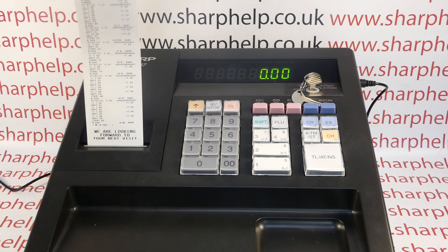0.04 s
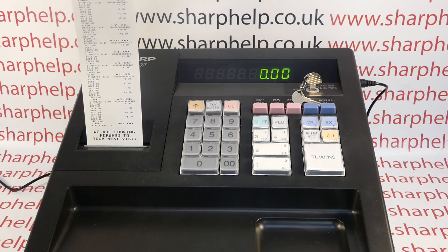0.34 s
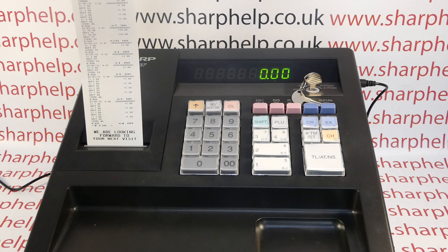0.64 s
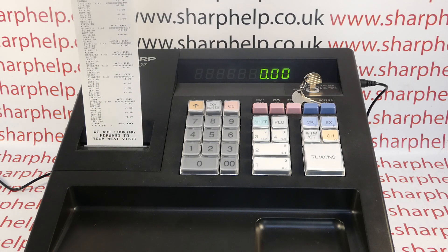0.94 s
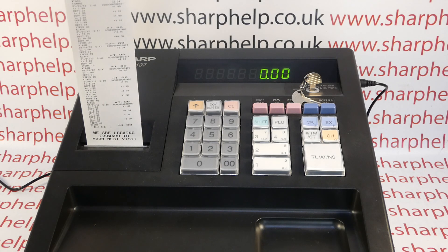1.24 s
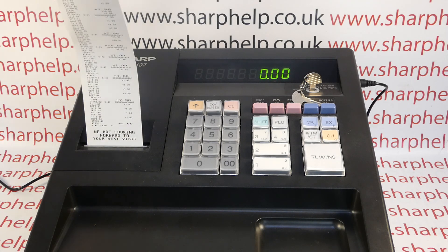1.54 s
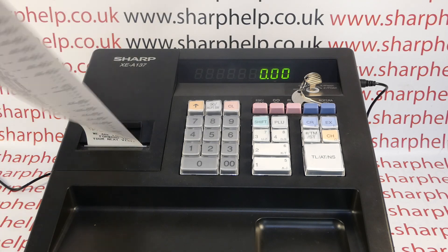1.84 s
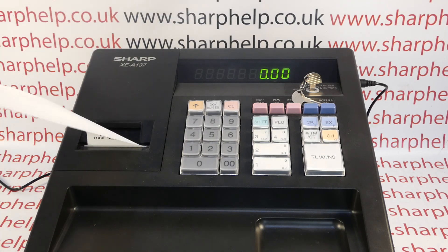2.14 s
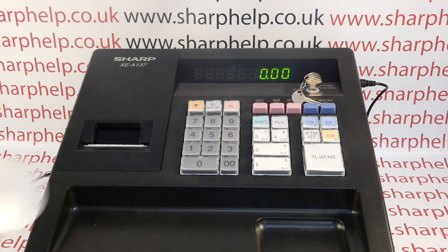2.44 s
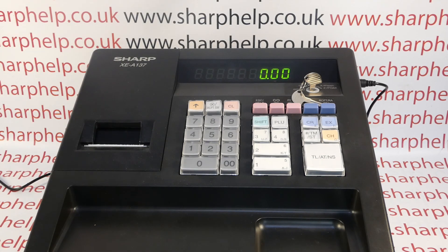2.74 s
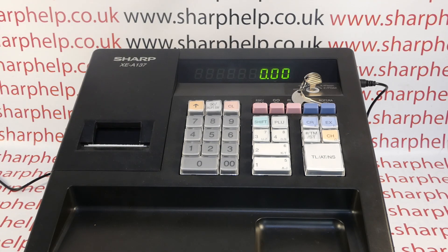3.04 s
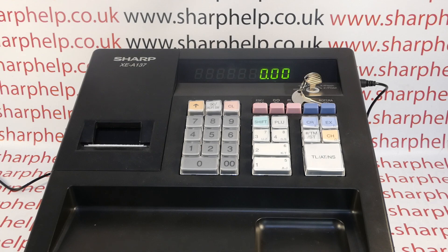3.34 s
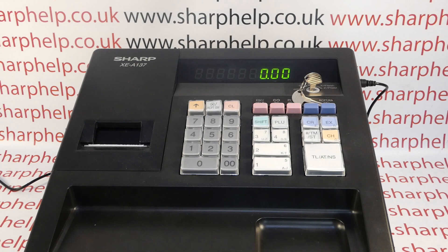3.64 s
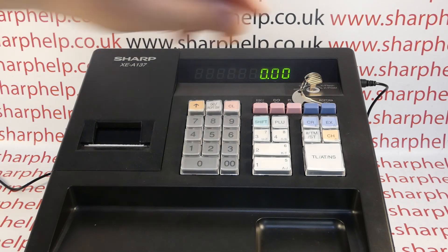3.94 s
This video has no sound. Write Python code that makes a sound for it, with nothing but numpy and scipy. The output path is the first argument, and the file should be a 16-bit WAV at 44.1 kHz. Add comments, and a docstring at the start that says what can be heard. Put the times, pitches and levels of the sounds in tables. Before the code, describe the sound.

A paper receipt is torn off and crumpled close by in a small, quiet room. At the start, a cash register's feed motor whines briefly, stopping with a light knock. From about 1.2 seconds a hand rustles softly along the strip, nicks it at 2 seconds and rips it off around 2.3. From 2.5 to 4 seconds the paper is crumpled, slightly left, with louder crackles, snaps and pops.

```python
"""A till's stepping motor whines briefly as it feeds paper, then stops with a knock. A hand
slides along the receipt, pulls it taut, nicks it on the serrated cutter, rips it off and crumples
it close by, in a small, quiet room. Fracturing fibres excite the resonances of sheet and housing;
friction and buckling make the rustle, snaps and pops."""
import sys
import numpy as np
from scipy import signal
from scipy.fft import rfft, irfft
from scipy.io import wavfile
from scipy.ndimage import map_coordinates

SR = 44100
rng = np.random.default_rng(int(sys.argv[2]) if len(sys.argv) > 2 else 0)


def bounce(signal):
    """Save signal as a 16-bit WAV file at the path given by the first command-line argument."""
    frames = np.transpose(np.atleast_2d(signal))
    limited = np.clip(frames, -1, 1)
    pcm = np.round(limited * 32767).astype(np.int16)
    wavfile.write(sys.argv[1], SR, pcm)


N = 176400
T = np.arange(N) / SR

# Each row: start and length in seconds, level and swell in dB, first and last sheet pitch in Hz.
CUTS = [(2.046, 0.029, -33, 0, 197, 215), (2.241, 0.12, -24.5, 2, 187, 796)]
# Each row: frequency in Hz, relative spectral density of the tearing in dB.
TEAR_SPECTRUM = [(50, -34), (135, -14), (185, 4), (450, -2), (1100, -4.5), (3000, -3), (5800, -5),
                 (10600, -11.5), (15500, -27.5)]
# Each row: frequency of a housing or cutter mode in Hz, relative level in dB, T60 in seconds.
HOUSING_MODES = [(208, -7, 0.33), (324, 3, 0.13), (495, -0.5, 0.52), (582, 5.5, 0.18), (1174, -2, 0.094),
                 (2980, 8, 0.095), (3670, -9, 0.087)]
FIBRES_PER_S, RIP_RELEASE_S, SHEET_WIDTH_HZ = 5000, 0.026, 114
def rips():
    """Fracture: breaking fibres excite housing and sheet, whose pitch rises as the uncut part narrows."""
    out = 0
    for s, length_s, db, swell_db, start_hz, end_hz in CUTS:
        progress = np.clip((T - s) / length_s, 0, 1)
        release = np.exp(-np.maximum(T - s - length_s, 0) / RIP_RELEASE_S)
        force = amp(db) * np.clip((T - s) / 0.0014, 0, 1) * release
        breaks = force * grains(FIBRES_PER_S, spread_db=-0.5) * amp(1.5 * drift(320))
        tear = colour(breaks * amp(swell_db * (progress - 0.5)), TEAR_SPECTRUM)
        bright_end = colour(breaks * progress ** 2, TREBLE)
        sheet_hz = start_hz * (end_hz / start_hz) ** (progress ** 2)
        sheet = (1 + progress ** 4) * gliding_ring(breaks, sheet_hz, SHEET_WIDTH_HZ)
        housing = sum(amp(level) * ring(breaks, hz, t60) / np.sqrt(t60 * SR)
                      for hz, level, t60 in HOUSING_MODES)
        out += tear + amp(-14) * bright_end + amp(-12) * sheet + amp(-6.5) * housing
    return out


# The paper's three bands. Each row: frequency in Hz, relative spectral density in dB.
LOWS = [(50, -21.5), (130, -17), (200, -4), (400, 3), (800, 3), (1300, 6), (1900, -1), (4000, -37)]
MIDS = [(600, -32.5), (1400, -6), (2000, 7.5), (3000, 8), (4500, 7), (6000, -25), (10000, -32.5)]
TREBLE = [(2500, -14), (4200, 12), (6200, 11.5), (8200, 4), (10300, 5), (12500, -6.5), (15500, -12.5)]
# Each row: start and length in seconds, then levels of lows, mids and treble in dB.
HAND_STROKES = [(1.178, 0.054, -59.5, -60, -65), (1.243, 0.047, -51.5, -52, -55),
                (1.296, 0.25, -62, -58, -57), (1.457, 0.18, -56, -68, -82), (1.538, 0.093, -63, -54.5, -52),
                (1.665, 0.099, -45.5, -47, -64), (1.77, 0.11, -45.5, -42.5, -46.5),
                (1.882, 0.07, -48, -44.5, -47.5), (1.96, 0.12, -56.5, -48.5, -49.5),
                (2.131, .1, -49, -44, -45), (2.501, 0.066, -44, -39.5, -60),
                (2.699, 0.16, -46.5, -47, -43.5), (2.861, 0.051, -34.5, -28.5, -36),
                (2.918, 0.084, -37.5, -27, -29), (3.009, 0.302, -40.5, -36, -34.5),
                (3.317, 0.072, -37.5, -33, -31), (3.393, 0.082, -42, -39.5, -39.5),
                (3.473, 0.13, -36.5, -36.5, -37.5), (3.613, 0.13, -44.5, -38, -38.5),
                (3.748, 0.077, -44, -40, -39), (3.819, 0.1, -40.5, -36, -35), (3.917, .14, -39, -41, -40)]
def rustle(texture):
    """Spectral shaping: each rub or squeeze sounds duller or brighter as the grip changes."""
    levels = sum(amp(db)[:, None] * envelope(s, length_s) for s, length_s, *db in HAND_STROKES)
    bands = [unit(flex(colour(texture, band))) for band in (LOWS, MIDS, TREBLE)]
    return sum(level * band for level, band in zip(levels, bands))


def crinkle(per_s, spread_db, cycles, rub_db):
    """Impulse excitation: clumps of tiny creases ring, each at its own pitch, over friction noise."""
    clicks = grains(per_s * amp(4 * drift(60)), spread_db)
    pitches = np.geomspace(400, 14000, 18)
    pitch_index = rng.integers(0, len(pitches), N)
    rings = sum(np.sqrt(hz) * unit(ring(clicks * (pitch_index == k), hz, cycles / hz))
                for k, hz in enumerate(pitches))
    return unit(unit(rings) + amp(-4) * clicks + amp(rub_db) * rng.standard_normal(N))


def flex(x, octaves=0.1, rate_hz=14):
    """Frequency modulation: after the last cut, the strip's resonances wander as it flexes."""
    freedom = np.clip(T - CUTS[-1][0], 0, 1)
    position = np.cumsum(2 ** (octaves * drift(rate_hz) * freedom))
    return map_coordinates(x, [position], order=5, mode="mirror")


# Each row: time in seconds, mid-band level in dB, lows and treble in dB from it, build-up in seconds.
BUCKLES = [(1.826, -30, -27, -10.5, 0.0021), (2.0425, -22, -1, 1.5, 0.00026),
           (2.129, -27.5, -11, -11, 0.00051), (2.243, -21, -5.5, 2, 0.00039),
           (2.584, -23.5, -26, 2, 0.00016), (2.709, -26.5, -15, -6, 0.00037),
           (2.864, -19.5, -18, -23, .0002), (2.991, -11.5, -3.5, -5, 0.0017),
           (3.333, -14, -17.5, -17, 0.0013), (3.374, -13.5, -7, -10, 0.0028),
           (3.438, -21.5, -8, -12, 0.00043), (3.557, -20.5, -2, -15, 0.0047),
           (3.895, -21, -20, -5, 0.00083)]
def snaps(decay_s=0.0013):
    """Buckling: the sheet gives way in bursts of cracks that swell and die within milliseconds."""
    low, mid, treble = np.zeros((3, N))
    half = SR // 40
    t = np.arange(-half, half) / SR
    for s, db, low_db, treble_db, build_s in BUCKLES:
        shape = np.exp(-abs(t) / np.where(t < 0, build_s, decay_s))
        burst = amp(db) * shape * rng.choice([-1, 1], len(t))
        span = slice(int(s * SR) - half, int(s * SR) + half)
        low[span] += burst * amp(low_db)
        mid[span] += burst
        treble[span] += burst * amp(treble_db)
    return colour(low, LOWS) + colour(mid, MIDS) + colour(treble, TREBLE)


# Each row: time in seconds, level in dB, pitch in Hz, T60 in seconds.
DENTS = [(1.516, -39.5, 2660, 0.015), (1.604, -31.5, 1823, 0.013), (1.722, -23, 1930, 0.0053),
         (1.749, -21, 1400, 0.0037), (1.856, -27.5, 2310, 0.017), (2.542, -20.5, 1990, 0.014),
         (2.76, -19, 3330, 0.0094), (2.821, -20, 1650, 0.0094), (3.2747, -1, 4270, 0.0014),
         (3.277, -10, 5800, 0.0085), (3.727, -17.5, 2520, 0.015), (3.786, -19, 3870, .012)]
def pops():
    """Snap-through: a dent flips over and rings for a moment at its own pitch."""
    rings = sum(ring(impulse(s, db), hz, t60) for s, db, hz, t60 in DENTS)
    return butterworth(rings, 1, 400, "high")


# Each row: start and length in seconds, level in dB, first and last pitch in Hz.
CURLS = [(1.344, 0.34, -57.5, 5030, 5900), (1.675, 0.066, -42.5, 1150, 1680),
         (2.701, 0.15, -35.5, 3240, 2300), (2.856, 0.078, -32.5, 2780, 3600),
         (3.609, 0.13, -37, 1800, 2920)]
def bends(width_hz=1050):
    """Variable resonance: creases excite a hollow ring that moves with the curl of the strip."""
    out, creases = 0, grains(3000, spread_db=3.5)
    for s, length_s, db, start_hz, end_hz in CURLS:
        hz = np.interp(T, [s, s + length_s], [start_hz, end_hz])
        out += amp(db) * gliding_ring(envelope(s, length_s) * creases, hz, width_hz)
    return butterworth(out, 2, [700, 7000], "band")


# Each row: start in seconds, level in dB, decay time constant in seconds.
SWISHES = [(2.583, -24, 0.038), (3.278, -34, 0.1), (3.549, -26.5, 0.035)]
def flicks():
    """Transient friction: the loose strip whips through the hand with a sudden, bright swish."""
    level = sum(amp(db) * (T >= s) * np.exp(-abs(T - s) / decay_s) for s, db, decay_s in SWISHES)
    spectrum = [(200, -18.5), (900, 1.5), (2500, 5.5), (5000, 4), (10000, -4), (15000, -21)]
    return colour(level * grains(5000, spread_db=2.9), spectrum)


# Each row: start and length in seconds, level in dB.
SKIMS = [(1.649, 0.042, -51.5), (1.786, 0.048, -43.5), (1.917, .025, -48.5), (3.097, 0.096, -40.5)]
# Each row: frequency in Hz, relative spectral density in dB.
SKIM_SPECTRUM = [(2000, -7), (10000, -2), (15500, -19)]
def slides():
    """Sliding friction: fingers skim the smooth paper with a thin, bright hiss."""
    level = sum(amp(db) * envelope(s, length_s) for s, length_s, db in SKIMS)
    return level * colour(rng.standard_normal(N), SKIM_SPECTRUM)


# Each row: time in seconds, then relative levels of step tone, octave, upper partials and hiss in dB.
MOTOR_LEVELS = [(0, -38, -30, -37, -41.5), (.045, -32.5, -34, -42.5, -41), (.072, -56, -27, -40.5, -41.5),
                (.104, -24.5, -35, -47.5, -46), (.124, -39.5, -51, -59, -61), (.16, -43, -63, -75, -51)]
# Each row: time in seconds, step rate in Hz.
STEP_RATE = [(0, 282.2), (.03, 292.4), (.06, 297.2), (.085, 287.6), (.105, 306.3)]
# Each row: harmonic number, relative level in dB.
UPPER_PARTIALS = [(3, -7), (4, 2.5), (6, -7), (8, -8.5)]
# Each row: frequency in Hz, relative spectral density in dB.
DRAG_SPECTRUM = [(150, -7), (600, 2), (1300, -8), (6000, -18.5), (10000, -22.5), (15000, -38)]
def feed_motor():
    """Periodic forcing: the motor's steps make a harmonic whine and pulse the dragged paper's hiss."""
    step, octave, upper, hiss = gains(MOTOR_LEVELS, fade_s=0.014)
    step_hz = np.interp(T, *np.transpose(STEP_RATE)) * (1 + 0.007 * drift(203))
    phase = 2 * np.pi * np.cumsum(step_hz) / SR
    partials = sum(amp(db) * np.sin(k * phase) for k, db in UPPER_PARTIALS)
    whine = step * np.sin(phase) + octave * np.sin(2 * phase) + upper * partials
    drag = hiss * colour(grains(6000, spread_db=2.2) * (1 + 0.5 * np.sin(phase)), DRAG_SPECTRUM)
    return whine + amp(5.5) * drag


# Each row: time in seconds, impulse level in dB.
KNOCKS = [(.019, -37.5), (.091, -60), (0.16, -44.5)]
# Each row: frequency in Hz, gain in dB, T60 in seconds.
FEED_MODES = [(305, -21, 0.36), (700, 5.5, 0.039), (3260, -11, 0.022)]
def feed_knocks():
    """Impact: each knock gives a noisy clack and sets the feed mechanism's modes ringing."""
    knocks = sum(impulse(s, db) for s, db in KNOCKS)
    clack = signal.fftconvolve(knocks, rng.standard_normal(N) * np.exp(-T / 0.007))[:N]
    clack = colour(clack, [(100, -47), (3000, 5), (10000, -2), (15000, -23)])
    return amp(-2.5) * clack + sum(amp(db) * ring(knocks, hz, t60) for hz, db, t60 in FEED_MODES)


# Each row: time in seconds, level in dB.
DRONE_LEVELS = [(1.42, -74), (1.5, -54), (1.64, -58.5), (1.72, -50), (2.03, -59.5), (2.06, -38.5),
                (2.13, -47.5), (2.23, -60)]
def drone():
    """Forced resonance: the taut strip rubs on the cutter and stirs the housing's lowest mode."""
    return gains(DRONE_LEVELS)[0] * unit(ring(rng.standard_normal(N), hz=212.7, t60=0.14))


# Each row: frequency in Hz, reverberation time in seconds.
ROOM_T60 = [(200, 0.59), (530, 0.067), (1400, 0.77), (3700, 0.86), (10000, 0.72)]
def room(x, desk_db, room_db, desk_t60=0.025):
    """Reverberation: quick desk reflections and a diffuse tail, different at each ear, follow the sound."""
    t, out = T[:SR // 2], []
    arrival = np.minimum(t / 0.003, 1) ** 2
    edges = np.geomspace(100, 16000, 9)
    for _ in range(2):
        tail = 0
        for lo, hi in zip(edges, edges[1:]):
            band = butterworth(rng.standard_normal(len(t)), 2, [lo, hi], "band")
            tail += arrival * band * amp(-60 * t / at_hz(ROOM_T60, np.sqrt(lo * hi)))
        desk = arrival * rng.standard_normal(len(t)) * amp(-60 * t / desk_t60)
        echoes = amp(room_db) * tail / np.linalg.norm(tail) + amp(desk_db) * desk / np.linalg.norm(desk)
        out.append(x + signal.fftconvolve(x, butterworth(echoes, 1, 300, "high"))[:N])
    return np.array(out)


# Each row: frequency in Hz, left minus right level in dB at a share of 1.
LEFT_BIAS = [(200, -4), (600, 6), (1300, 5), (2600, 4.5), (6000, 1), (12000, 1.5)]
def lean_left(pair, share):
    """Interaural level difference: stronger mids and treble place the source to the left."""
    return np.array([colour(x, [(hz, side * share * db / 2) for hz, db in LEFT_BIAS], keep_level=True)
                     for x, side in zip(pair, (1, -1))])


# Each row: frequency in Hz, relative spectral density in dB.
AIR_SPECTRUM = [(20, -32), (95, -21), (130, -3), (180, -14), (235, -8), (480, -10), (919, -8), (1140, -12),
                (2500, -27), (15500, -42)]
def room_tone():
    """Stationary noise: soft air, with a low spectral peak heard as a hum."""
    mid, side = (colour(rng.standard_normal(N), AIR_SPECTRUM) for _ in range(2))
    return amp(-58.5) * np.array([mid + side, mid - side])


def amp(db):
    """Decibels to amplitude ratio."""
    return 10 ** (np.asarray(db) / 20)


def unit(x):
    """Normalisation to rms 1."""
    return x / np.sqrt(np.mean(x ** 2) + 1e-20)


def gains(rows, fade_s=0.0037):
    """Interpolation of dB curves into gains that fade outside their span."""
    s, *columns = np.transpose(rows)
    outside = np.maximum(np.maximum(s[0] - T, T - s[-1]), 0)
    return [amp(np.interp(T, s, db)) * np.exp(-outside / fade_s) for db in columns]


def envelope(s, length_s, attack_s=0.0089, release_s=0.0097):
    """Linear attack, hold and exponential release."""
    return np.clip((T - s) / attack_s, 0, 1) * np.exp(-np.clip((T - s - length_s) / release_s, 0, 20))


def at_hz(points, hz):
    """Interpolation on a log-frequency axis."""
    f, values = np.transpose(points)
    return np.interp(np.log(np.maximum(hz, 1)), np.log(f), values)


def colour(x, spectrum, keep_level=False):
    """Minimum-phase filtering by (Hz, dB) points, at unit power unless the level is kept."""
    size = 4096
    cepstrum = irfft(np.log(amp(at_hz(spectrum, np.fft.rfftfreq(size, 1 / SR)))))
    cepstrum[1:size // 2] *= 2
    cepstrum[size // 2 + 1:] = 0
    response = irfft(np.exp(rfft(cepstrum)))
    return signal.oaconvolve(x, response if keep_level else response / np.linalg.norm(response))[:N]


def butterworth(x, order, hz, kind):
    """Maximally flat filtering."""
    return signal.sosfilt(signal.butter(order, hz, kind, fs=SR, output="sos"), x)


def drift(rate_hz):
    """Random modulation through knots of standard deviation 1."""
    knots = rng.standard_normal(4000)
    return np.interp(T * rate_hz, np.arange(len(knots)), knots)


def impulse(s, db):
    """A one-sample excitation."""
    return amp(db) * (np.arange(N) == int(s * SR))


def grains(per_s, spread_db):
    """Shot noise: random clicks of uneven size, rms 1."""
    sizes = amp(spread_db * np.minimum(rng.exponential(1, N), 4)) * rng.choice([-1, 1], N)
    return unit(sizes * (rng.random(N) < per_s / SR))


def ring(x, hz, t60):
    """Damped oscillation of one mode, falling 60 dB in t60 seconds."""
    r, w = np.exp(-np.log(1000) / (t60 * SR)), 2 * np.pi * hz / SR
    return signal.lfilter([0, np.sin(w)], [1, -2 * r * np.cos(w), r * r], x + 1e-18)


def gliding_ring(x, hz, width_hz):
    """Heterodyning: shifting down, low-passing and shifting back gives a moving resonance."""
    carrier = np.exp(2j * np.pi * np.cumsum(hz) / SR)
    r = np.exp(-np.pi * width_hz / SR)
    return np.real(carrier * signal.lfilter([np.sqrt(2 * (1 - r * r))], [1, -r], x / carrier + 1e-18))


def scene():
    """Superposition of handled paper, cutter and feed in the room."""
    texture = crinkle(per_s=3500, spread_db=4, cycles=4.5, rub_db=5.5)
    paper = rustle(texture) + bends() + snaps() + pops() + flicks() + slides()
    cutter = butterworth(rips() + drone(), 3, 150, "high")
    till = lean_left(room(cutter, desk_db=-6, room_db=-7), share=0.31)
    hand = lean_left(room(paper, desk_db=-5, room_db=-12), share=0.87)
    feed = butterworth(feed_motor() + feed_knocks(), 3, 200, "high")
    return till + hand + room(feed, desk_db=-6.5, room_db=-13.5) + room_tone()


def record(dry, cutoff_hz=15600):
    """Band limiting: a steep low-pass cuts the highest treble."""
    return signal.sosfilt(signal.ellip(10, 0.1, 80, cutoff_hz, fs=SR, output="sos"), dry)


dry = scene()
out = record(dry)
bounce(out)
```